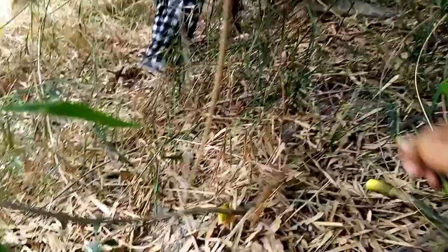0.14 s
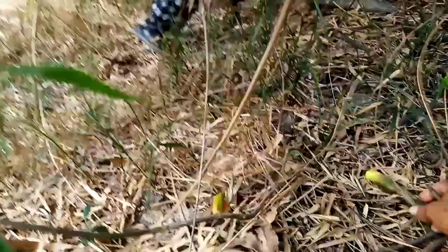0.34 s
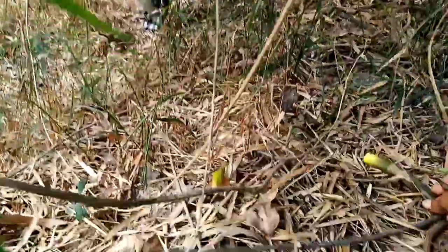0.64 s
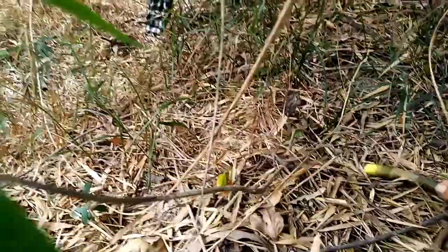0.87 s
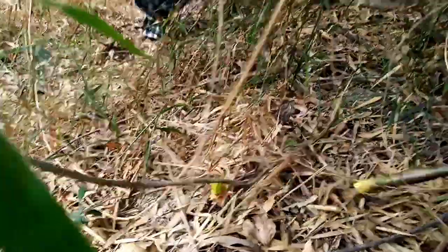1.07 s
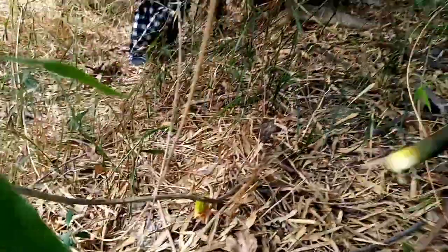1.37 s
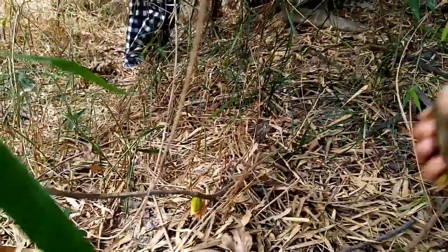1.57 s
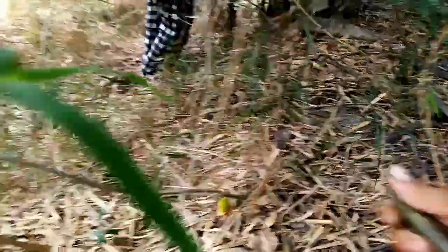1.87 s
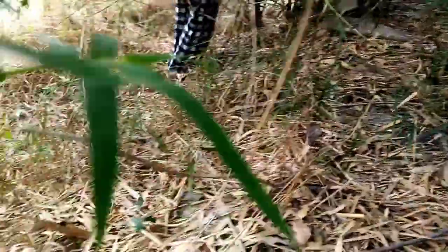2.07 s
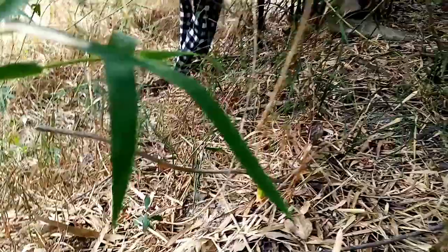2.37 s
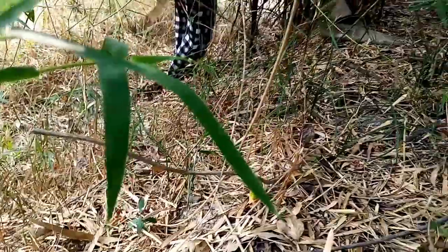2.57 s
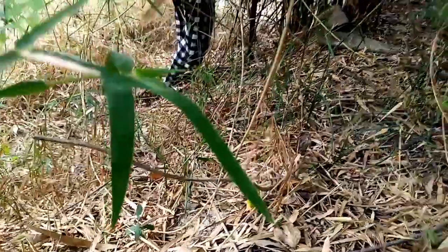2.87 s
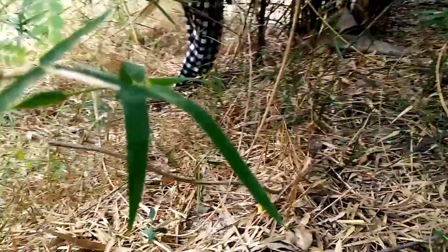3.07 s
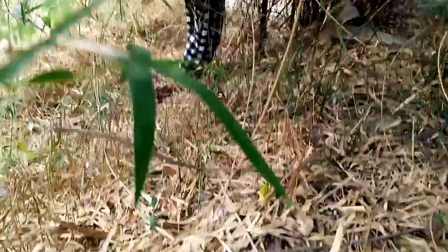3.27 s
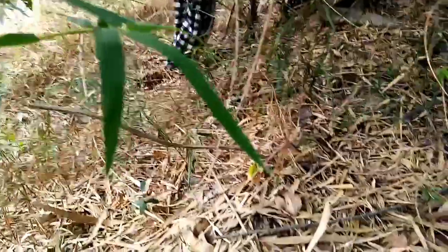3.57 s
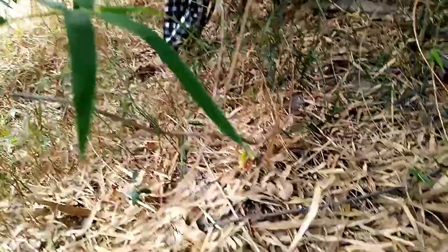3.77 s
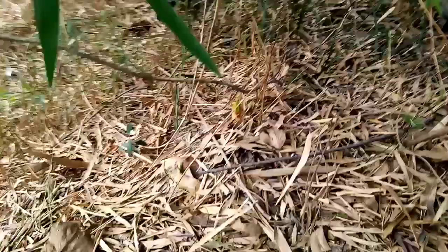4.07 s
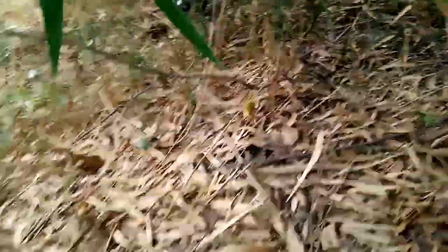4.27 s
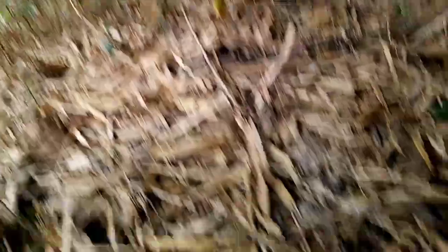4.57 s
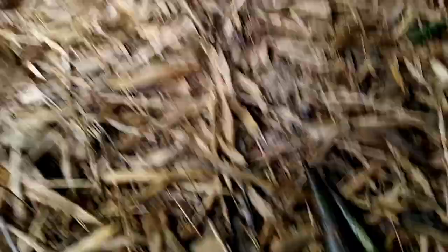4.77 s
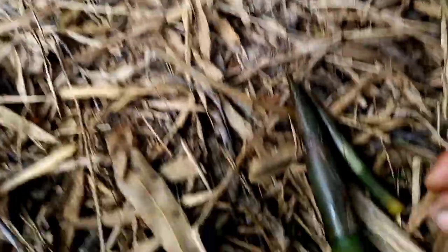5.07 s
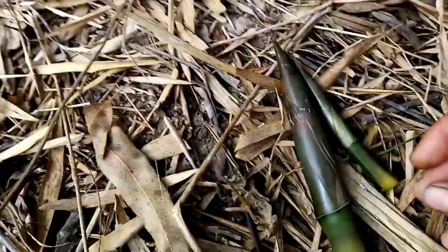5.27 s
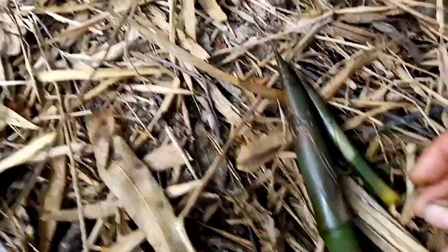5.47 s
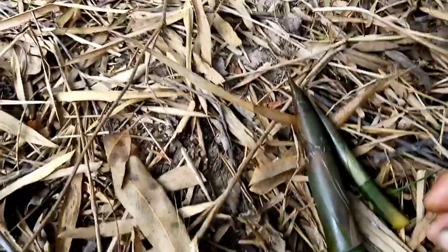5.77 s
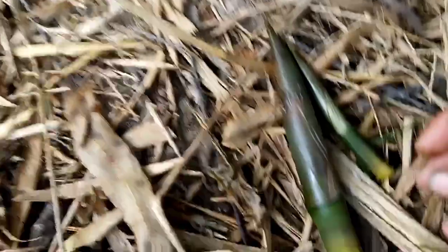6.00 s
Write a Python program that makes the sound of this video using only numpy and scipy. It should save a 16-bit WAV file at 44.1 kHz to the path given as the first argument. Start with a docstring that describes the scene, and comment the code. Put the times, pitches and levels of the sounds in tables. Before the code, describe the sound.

Footsteps wade through deep dry bamboo leaves outdoors, with close, crisp crunching and crackling and many small twigs snapping.

```python
"""Feet wade through deep, dry bamboo leaves outdoors, close to a pair of microphones.
From the first step, each push sets off a crackle of tiny leaf fractures, with snapping twigs and scuffs.
At 1.2 s a hollow stem knocks underfoot. Around 3.4 s a heavy step thuds on packed soil, a softer one
at 4.6 s. Near the end the steps grow lighter and two faint, high, bird-like chirps sound. All along,
each crack scatters briefly through the litter and the stems around, over a bed of still air."""
import sys
import numpy as np
from scipy import signal
from scipy.fft import rfft, irfft, next_fast_len
from scipy.io import wavfile

SR = 44100
rng = np.random.default_rng(int(sys.argv[2]) if len(sys.argv) > 2 else 0)


def int16_out(signal):
    """Quantize to a 16-bit WAV file."""
    q = np.round(np.clip(np.atleast_2d(signal).T, -1, 1) * 32767)
    wavfile.write(sys.argv[1], SR, q.astype(np.int16))


N = 270774
TIME = np.arange(N) / SR

# Where the feet are. Each row: time in seconds, right microphone's lag in ms, rustle pan in dB (L-R).
BEARING = [(0, 0.69, -.5), (.8, 0.71, -0.5), (1.1, 0.67, 0), (1.23, 1.26, 2), (1.55, 0.81, 1),
           (1.7, 0.81, 0), (2.4, 0.65, 0.5), (3.3, 0.74, -2.5), (3.7, 0.7, 0.5), (4.4, 0.73, -2),
           (5.5, 0.86, 2), (6.14, 0.8, -0.5)]


def foot_pressure(attack_s=.024, release_s=.027):
    """Wading, pushes and collapsing wads load the litter: dB curves for ground, deep and top leaves."""
    # Legs stir the loose top leaves. Each row: time in seconds, level in dB.
    wading = [(0.0, -32), (0.66, -35), (0.95, -29.5), (1.42, -34.5), (2.1, -35), (2.29, -36.1),
              (2.86, -37.0), (2.95, -42), (3.22, -37.5), (3.65, -30.5), (4.08, -33.5), (4.66, -35),
              (4.75, -41), (5.28, -35), (5.35, -45.5), (5.47, -41.5), (5.6, -51.5), (6.14, -29.5)]
    # A foot presses in. Each row: start and hold in seconds, top-leaf level and foot weight in dB.
    pushes = [(0, 0.081, -30, 4), (0.114, 0.097, -29.5, 3), (0.255, 0.091, -31.5, 1.5), (0.46, .12, -35, 4),
              (0.751, 0.021, -29, 1.5), (0.846, 0.05, -30, 1), (.964, 0.1, -31.5, .5),
              (1.166, 0.035, -28, -4), (1.225, 0.038, -28.5, 4.5), (1.346, 0.094, -37, -25),
              (1.619, 0.1, -29, 3), (1.681, 0.11, -31.5, 4.5), (1.855, 0.078, -35, 4.5),
              (1.993, 0.11, -29.5, 2.5), (2.13, 0.045, -33.5, 2.5), (2.351, 0.032, -32, 0.5),
              (2.385, 0.11, -36.5, 1), (2.585, 0.055, -33.5, -1), (2.715, 0.02, -28.5, 2.5),
              (2.806, 0.057, -30.5, -0.5), (3.257, 0.092, -36, 5), (3.409, 0.017, -24, 3.5),
              (3.523, 0.025, -26, -.5), (3.683, .13, -28, -2.5), (3.845, .1, -40, 0),
              (4.178, .058, -35.5, -1), (4.323, 0.078, -42, 6.5), (4.434, .12, -33.5, 3.5),
              (4.54, .14, -33.5, 4), (4.82, 0.085, -42.5, -2), (5.184, 0.033, -35, -2),
              (5.858, 0.1, -39.5, 1.5), (5.978, 0.074, -33, 4.5)]
    # A wad gives way. Each row: peak time and half length in seconds, ground, deep and top levels in dB.
    crunches = [(0.008, 0.014, -41, -38, -35.5), (0.884, 0.01, -62, -44, -23.5),
                (1.217, 0.0071, -53, -38, -25), (2.046, 0.0055, -66, -36, -22),
                (2.344, 0.0073, -73, -50, -28.5), (3.285, 0.0016, -37, -25, -32),
                (3.304, .011, -46, -32.5, -25.5), (3.401, .003, -40, -26.5, -30),
                (3.41, 0.013, -44.5, -27, -20), (4.576, 0.0058, -44, -30, -30)]
    t, wading_db = TIME[::20], in_time(wading)[0][::20]
    power = from_db([wading_db - 32, wading_db - 11, wading_db]) ** 2
    for start, hold, db, weight in pushes:
        swell = np.exp(-np.maximum(start - t, 0) / attack_s - np.maximum(t - start - hold, 0) / release_s)
        levels = [db - 33 + 2.8 * weight, db - 9 + weight, db]  # weight brings out the ground most
        power += from_db(levels)[:, None] ** 2 * swell ** 2
    for peak, half_length, *levels in crunches:
        power += from_db(levels)[:, None] ** 2 * np.exp(-((t - peak) / half_length) ** 2)
    return np.array([np.interp(TIME, t, 10 * np.log10(layer)) for layer in power])


def leaf_crackle(tread, firm_cracks_per_s=8500, firm_db=-33, jitter_s=.00007, bounce_s=.0012):
    """Tiny fractures, each with its own size, colour and direction, bounce off nearby leaves."""
    # The litter's tone. Each row: frequency in Hz, gain in dB.
    litter_eq = [(25, -1), (60, 3), (130, 14.5), (250, 18), (500, 17.5), (750, 15.5), (1100, 13.5),
                 (1700, 13), (2600, 11), (4000, 7.5), (7000, 4.5), (16000, 7.5)]
    size_spread_db, colour_spread_db, clump_db, patch_db = 4.5, 3.2, .65, 2
    lag_ms, pan_db = in_time(BEARING)
    # A light touch breaks fewer leaves, so single cracks stand out.
    density = np.clip(from_db(.7 * (tread[2] - firm_db)), .15, 3)
    at = np.flatnonzero(rng.random(N) < firm_cracks_per_s * density / SR)
    size_draw, jitter = rng.standard_normal((2, N))[:, at]
    sizes = from_db(size_spread_db * np.minimum(size_draw, 3.2) + clump_db * drift(per_s=260)[at])
    sizes = rms_one(sizes) * np.sqrt(SR / (firm_cracks_per_s * density[at]))
    # Every crack reaches each microphone directly and by two short detours.
    direct = np.array([at, at + lag_ms[at] * SR / 1000 + jitter_s * SR * jitter])
    detours = direct + bounce_s * SR * rng.exponential(1, (2, 2, N))[..., at]
    arrivals = np.clip(np.round([direct, *detours]), 0, N).astype(int)
    echoes = .73 * rng.standard_normal((2, 2, N))[..., at]
    share_hz = [380, 1100, 2200, 5000]
    layer_shares = [[.98, .12, .0024, .035],  # ground: bass
                    [.019, 1, .99, .036],  # packed deep leaves: mids
                    [.0035, .051, .034, 1]]  # loose top leaves: treble
    levels, out = tread[:, at], np.zeros((2, N))
    edges_hz = np.geomspace(28 + 300, 17000 + 300, num=27) - 300
    for low, high in zip(edges_hz, edges_hz[1:]):
        hz = np.sqrt(low * high)
        shares = [np.interp(np.log(hz), np.log(share_hz), layer) for layer in layer_shares]
        polarity, tint = rng.standard_normal((2, N))[:, at]
        colour = rms_one(from_db(colour_spread_db * tint + patch_db * drift(per_s=45)[at]))
        band_gain = from_db(np.dot(shares, levels) + at_hz(litter_eq, hz) - 2.5)
        strength = sizes * np.sign(polarity) * colour * band_gain
        bounces = echoes * hz / np.hypot(hz, 1100)  # long waves pass the leaves without bouncing
        hits = np.array([np.ones(direct.shape), *bounces]) * strength
        clicks = [np.bincount(arrivals[:, mic].ravel(), hits[:, mic].ravel(), N)[:N] for mic in (0, 1)]
        out += filtered(np.array(clicks) + 1e-18, 2, [low, high], "band")
    return panned(out, pan_db)


def twig_snaps(stem_breaks, crack_band_hz=(3500, 11500), splinter_s=.0064, knock_decay_cycles=3.6):
    """Twigs and stems break: a burst of tearing fibres, late splinters and the piece's short ring."""
    # Twigs and stiff leaves. Each row: start in seconds, crack level in dB, knock level in dB,
    # knock pitch in Hz, pan in dB (L-R), tear length in ms.
    twigs = [(0.014, -24, -30, 1440, -8, 0.5), (0.0189, -23, -26.5, 1470, -12, 0.84),
             (0.1138, -16.5, -28, 1530, 7, 0.65), (0.1423, -27, -22.5, 1650, -7, 2.5),
             (0.1721, -17, -13.5, 2680, 1, 3.8), (0.6819, -26.5, -30, 4100, 4, 2.2),
             (0.7096, -22.5, -52, 5000, 10, 3.3), (0.7459, -20.5, -49, 5000, 18, 3.1),
             (0.9616, -24.5, -30, 2840, 2, 1.6), (1.0007, -17, -23, 2670, -2, 7.8),
             (1.1588, -20, -30, 4740, -7, 1.1), (1.249, -36, -28.5, 1660, 8, 1.3),
             (1.6118, -12.5, -15.5, 4840, 8, 1.5), (1.9161, -28, -18, 2230, 16, 0.79),
             (1.9818, -28, -19, 2180, 11, 0.45), (2.0056, -17, -24, 1390, 17, 2.5),
             (2.0328, -20, -24, 3230, 3, 0.72), (2.3316, -22.5, -36, 4030, -6, 2.9),
             (3.03, -27.5, -52, 4870, -4, 8.7), (3.0864, -27.5, -50, 4110, 2.5, 4.1),
             (3.2844, -27, -29, 2930, -16, 1.8), (3.424, -13.5, -40, 4070, -2, 1.1),
             (3.4577, -18, -19, 4200, -2.5, 1.9), (3.5945, -19, -25.5, 2300, -4, 5.1),
             (3.63, -18.5, -18, 2650, 2, 1.7), (3.631, -12, -26, 1510, -3, 1.3),
             (3.6653, -22.5, -44, 4130, 2, 2.4), (4.0223, -21, -23.5, 2680, 1, 1.2),
             (4.1287, -25, -24.5, 4100, 5, 3.4), (4.425, -29, -30, 2420, 14, 1.6),
             (4.6045, -20, -34, 2930, -9, 1.2), (4.8097, -33.5, -36, 4870, 8, 1.4),
             (4.9833, -30.5, -50, 4690, 8, 0.71), (5.072, -22.5, -48, 4670, 9, 0.76),
             (5.1426, -26, -47, 4970, -3, 2.5), (5.2458, -25.5, -50, 4950, 0, 0.8),
             (5.286, -29, -45, 4070, -9, 0.5), (5.4584, -19.5, -27, 2720, -0.5, 1.2),
             (5.9102, -28, -52, 4590, -2, 0.65), (5.9439, -21, -50, 4800, -4, 1)]
    out, t = np.zeros((2, N + SR)), np.arange(SR // 40) / SR
    lag_ms = in_time(BEARING)[0]
    for start, crack_db, knock_db, hz, pan_db, length_ms in list(twigs) + stem_breaks:
        tearing = np.exp(-(1000 * t / length_ms / 1.4) ** 2)
        fibres = rng.standard_normal((2, len(t))) * (tearing + .24 * np.exp(-t / splinter_s))
        crack = filtered(fibres, 4, crack_band_hz[0], "high")
        crack = filtered(crack, 1, crack_band_hz[1], "low")
        ring = np.sin(2 * np.pi * hz * t) * np.exp(-t * hz / knock_decay_cycles)
        knock = signal.fftconvolve(fibres * tearing, ring[None], axes=1)[:, :len(t)]
        knock = filtered(knock, 3, min(.54 * hz, 1500), "high")  # a twig radiates little below its ring
        snap = from_db(crack_db - 1.5) * energy_one(crack) + from_db(knock_db - 2.5) * energy_one(knock)
        snap *= np.sqrt(SR / 200)  # levels count the energy as if spread over 5 ms
        sides = rms_one(from_db(np.array([.35, -.35]) * pan_db))
        at = round(start * SR)
        for mic, arrival in enumerate((at, at + round(lag_ms[at] * SR / 1000))):
            out[mic, arrival:arrival + len(t)] += sides[mic] * snap[mic]
    return out[:, :N]


def small_stems(top_db, per_s=30, low_hz=1370, high_hz=5000, length_ms=1.8, spread_db=2.5):
    """Small stems break at random, as hard as the top leaves are pressed: rows for twig_snaps."""
    gap_draw, pitch_draw = rng.random((300, 2)).T
    level_draw, pan_db = rng.standard_normal((300, 2)).T
    times = np.cumsum(-np.log(1 - gap_draw)) / per_s
    db = np.interp(times, TIME, top_db) + spread_db * level_draw
    hz = low_hz * (high_hz / low_hz) ** pitch_draw
    rows = np.transpose([times, db + 1, db - 11, hz, pan_db, np.full(len(times), length_ms)])
    return rows[times < TIME[-1]].tolist()


def thuds(sag=.306, sag_s=.012, rise_s=.0015):
    """A foot lands on packed soil and buried stems: a damped bump that sags as the sole settles."""
    # Each row: start in seconds, pitch midway through the sag in Hz, decay in seconds, level in dB.
    landings = [(3.284, 165, 0.0045, -27.5), (3.318, 126, 0.019, -39.5), (3.401, 717, 0.0057, -16.5),
                (3.406, 404, 0.014, -33), (3.416, 282, 0.0058, -37), (4.572, 515, 0.0089, -38)]
    out = np.zeros(N)
    for start, hz, decay, db in landings:
        t = np.maximum(TIME - start, 0)
        cycles = hz * ((1 - sag) * t + 2 * sag * sag_s * (1 - np.exp(-t / sag_s)))
        out += from_db(db) * np.sin(2 * np.pi * cycles) * np.exp(-t / decay) * (1 - np.exp(-t / rise_s))
    return at_mics(out)


def hollow_stem(start_s=1.21, rise_s=.0034):
    """A trodden bamboo tube knocks with its two lowest modes."""
    # Each row: pitch in Hz, level in dB, decay in seconds.
    modes = [(964, -23.5, 0.0087), (1955, -21, 0.0095)]
    t = np.maximum(TIME - start_s, 0)
    ring = sum(from_db(db) * np.sin(2 * np.pi * hz * t) * np.exp(-t / decay) for hz, db, decay in modes)
    return panned(at_mics(ring * (1 - np.exp(-t / rise_s))), pan_db=6)


def scuffs_and_chirps():
    """Narrow gliding resonances: scuffs, and two faint, high, bird-like chirps near the end."""
    # Each row: start and end in seconds, first and last pitch in Hz, bandwidth in Hz, level in dB.
    # The chirps are the rows at 5.41 s and 5.806 s.
    glides = [(0.201, 0.627, 1175, 1302, 130, -49), (.82, 1.078, 1050, 1640, 201, -45),
              (1.754, 1.9, 270, 173, 60, -52.5), (2.179, 2.625, 1137, 1276, 101, -48.5),
              (2.787, 2.854, 1050, 1110, 130, -45.5), (3.235, 3.467, 864, 947, 320, -45),
              (4.37, 4.55, 400, 240, 110, -52.5), (4.562, 4.702, 130, 246, 70, -53.5),
              (4.66, 4.795, 302, 400, 110, -53), (5.169, 5.26, 2064, 2500, 300, -44),
              (5.41, 5.466, 2200, 3840, 120, -46), (5.806, 5.892, 2750, 2900, 250, -47),
              (5.944, 6.033, 205, 310, 45, -48)]
    out = np.zeros(N)
    for start, end, from_hz, to_hz, width_hz, db in glides:
        progress = np.clip((TIME - start) / (end - start), 0, 1)
        phase = 2 * np.pi * np.cumsum(from_hz + (to_hz - from_hz) * progress) / SR
        flutter = filtered(rng.standard_normal((2, N)), 2, width_hz / 2, "low")
        resonance = rms_one(flutter[0] * np.cos(phase) + flutter[1] * np.sin(phase))
        out += from_db(db) * np.sin(np.pi * progress) * resonance
    return at_mics(out)


def grove_scatter(x, wet_db=-17, t60_s=.11, predelay_s=.003):
    """The stems around add a faint, short tail, different at each microphone."""
    t = np.arange(SR // 2) / SR
    tail = rng.standard_normal((2, len(t))) * from_db(-60 * t / t60_s) * (t > predelay_s)
    return x + from_db(wet_db) * signal.fftconvolve(x, energy_one(tail), axes=1)[:, :N]


def still_air(level_db=-56.5):
    """Outdoor air lays a quiet, dark bed of noise."""
    # Each row: frequency in Hz, relative noise density in dB.
    spectrum = [(25, -23), (60, -3), (130, -1.5), (264, -5.5), (500, -8.5), (1030, -10), (2500, -36),
                (7000, -17), (10000, -37), (15000, -42)]
    return from_db(level_db) * rms_one(coloured(rng.standard_normal((2, N)), spectrum))


def at_mics(x):
    """Mono to stereo: the left microphone hears the sound first."""
    lag_s = in_time(BEARING)[0] / 1000
    return np.array([x, np.interp(TIME - lag_s, TIME, x)])


def panned(x, pan_db):
    """Raise one side and lower the other; positive leans left."""
    return np.array([x[0] * from_db(pan_db / 2), x[1] * from_db(-pan_db / 2)])


def from_db(db):
    """Decibels to gain."""
    return 10 ** (np.asarray(db) / 20)


def rms_one(x):
    """Scale to unit rms."""
    return x / np.sqrt(np.mean(x ** 2) + 1e-20)


def energy_one(x):
    """Scale each channel to unit energy."""
    return x / np.linalg.norm(x, axis=1, keepdims=True)


def in_time(rows):
    """Turn timed breakpoints into one automation curve per column."""
    times, *columns = np.transpose(rows)
    return [np.interp(TIME, times, column) for column in columns]


def at_hz(points, hz, column=1):
    """Read an EQ curve on a log-frequency axis."""
    points = np.array(points)
    return np.interp(np.log(hz + 1), np.log(points[:, 0]), points[:, column])


def coloured(x, points, column=1):
    """Apply a smooth EQ curve."""
    size = next_fast_len(N + SR // 10)
    gain = from_db(at_hz(points, np.fft.rfftfreq(size, 1 / SR), column))
    return irfft(rfft(x, size) * gain, size)[..., :N]


def filtered(x, order, hz, kind):
    """Low-, high- or band-pass with a flat passband."""
    return signal.sosfilt(signal.butter(order, hz, kind, fs=SR, output="sos"), x)


def drift(per_s):
    """A random wander of unit rms, with per_s new values a second."""
    knots = rng.standard_normal(4000)
    return rms_one(np.interp(TIME * per_s, np.arange(len(knots)), knots))


def scene():
    """Crackle, snaps, scuffs, chirps and knocks scatter through the grove, over the quiet air."""
    air = still_air()
    tread = foot_pressure()
    crackle = leaf_crackle(tread)
    snaps = twig_snaps(small_stems(top_db=tread[2]))
    return grove_scatter(crackle + snaps + scuffs_and_chirps() + thuds() + hollow_stem()) + air


def record(dry, cutoff_hz=15550):
    """The microphone ports resonate in the treble, peaks are rounded and the top is cut."""
    # Each row: frequency in Hz, left gain in dB, right gain in dB.
    port_eq = [(100, 1.5, -4.5), (1220, 0.5, -6), (2940, 0.5, -5.5), (4920, 1, -2), (6800, 5, 5),
               (7300, 4, 5.5), (7800, 8, 3), (7950, -1, 3), (8460, -7, -0.5), (10110, -12, -10),
               (12040, -21.5, -14.5), (13800, -37, -13.5), (14650, -19, -9.5), (15200, -17.5, -6)]
    heard = np.array([coloured(dry[0], port_eq, column=1), coloured(dry[1], port_eq, column=2)])
    high_cut = signal.ellip(10, .3, 80, cutoff_hz, fs=SR, output="sos")
    return signal.sosfilt(high_cut, np.tanh(heard))


dry = scene()
out = record(dry)
int16_out(out)
```